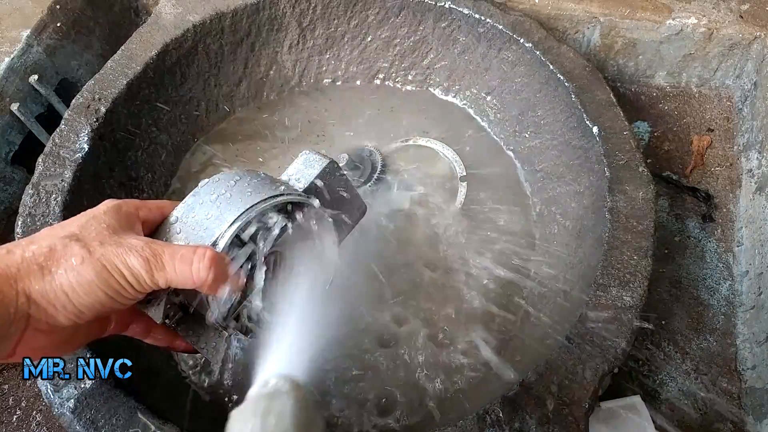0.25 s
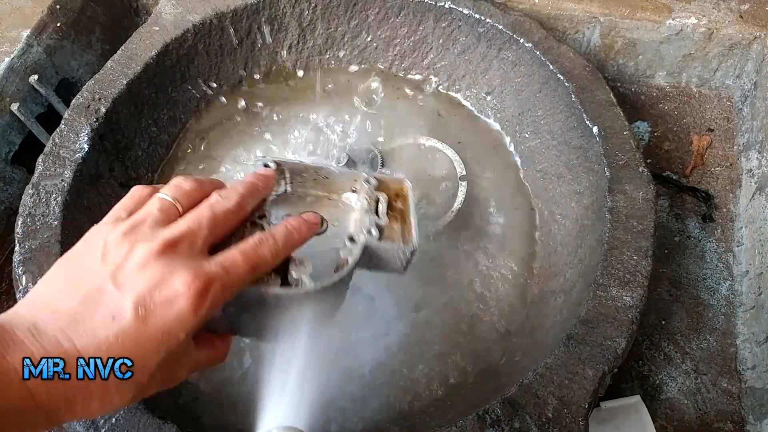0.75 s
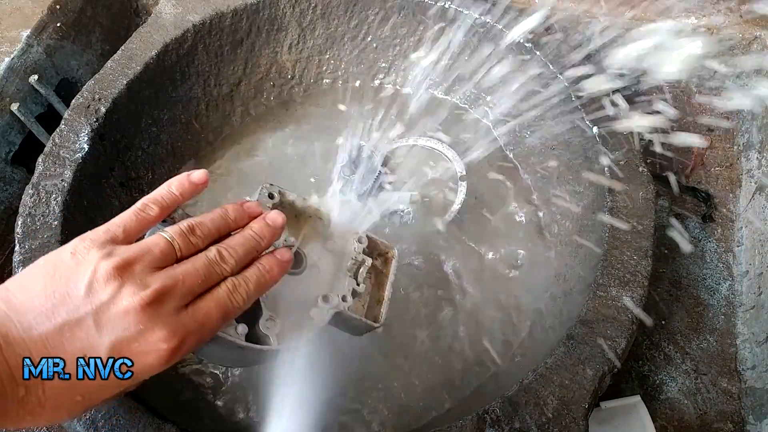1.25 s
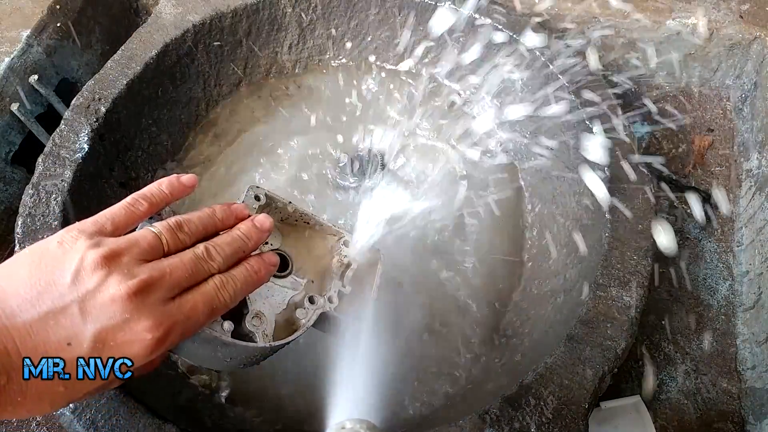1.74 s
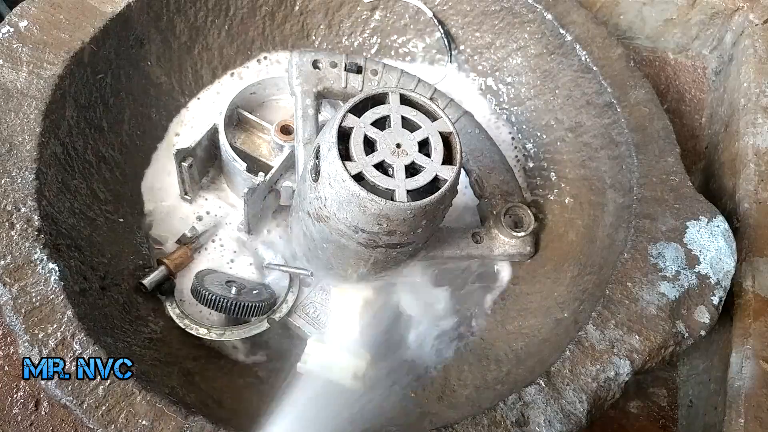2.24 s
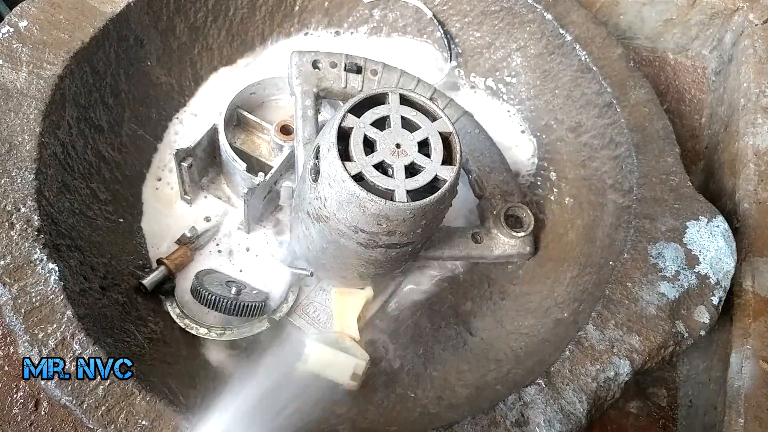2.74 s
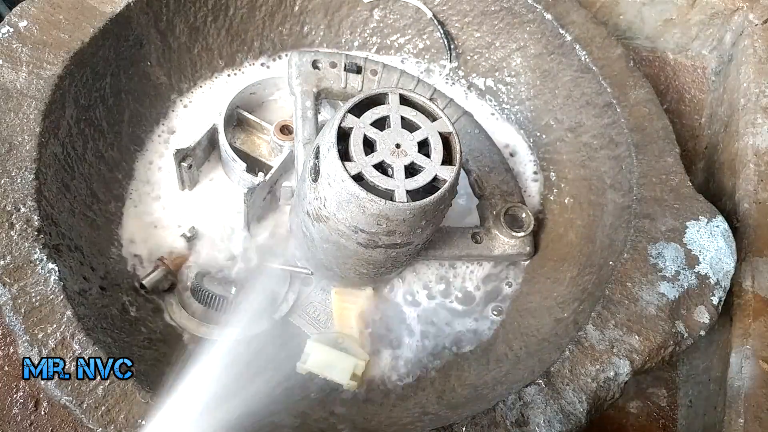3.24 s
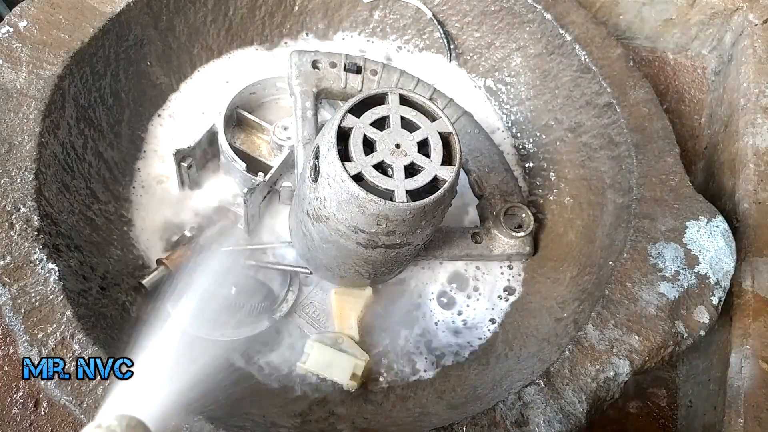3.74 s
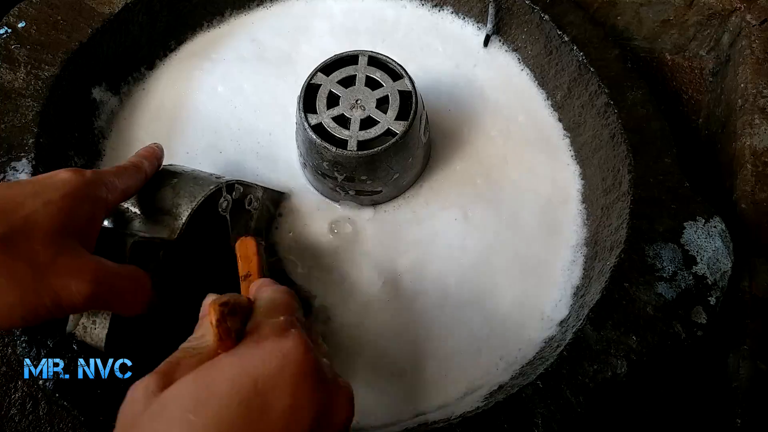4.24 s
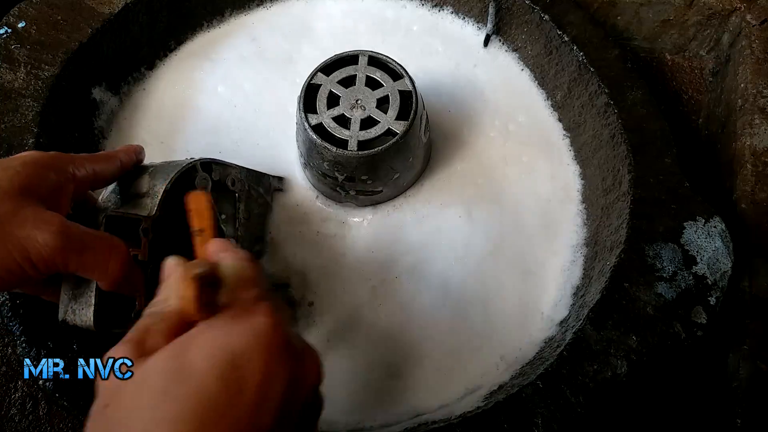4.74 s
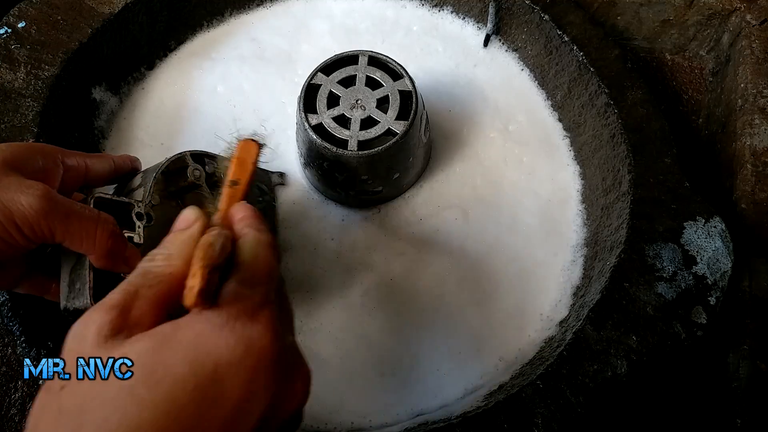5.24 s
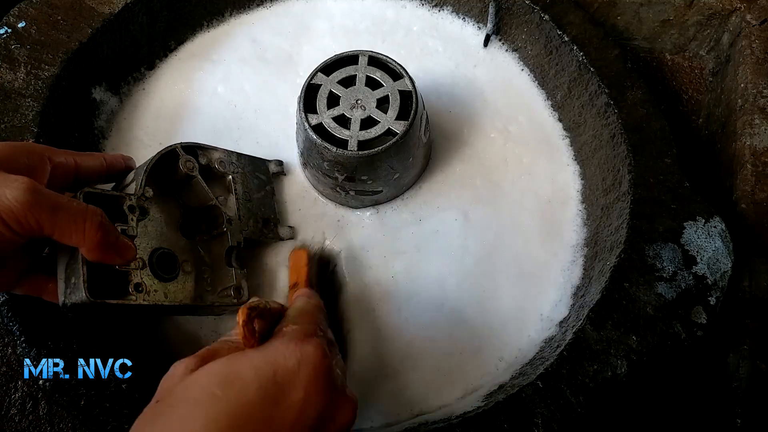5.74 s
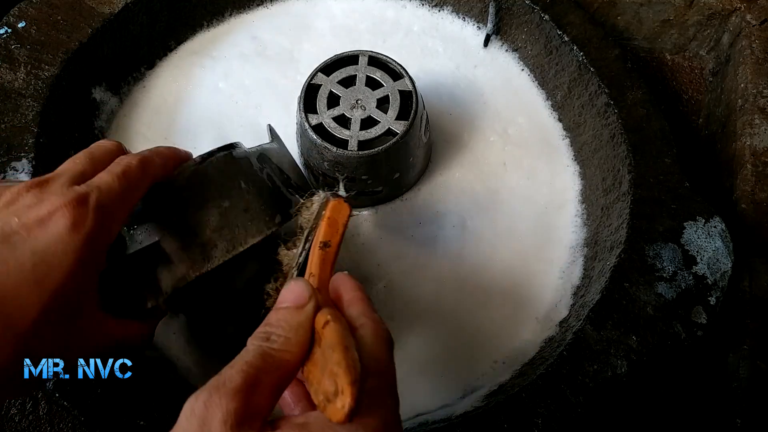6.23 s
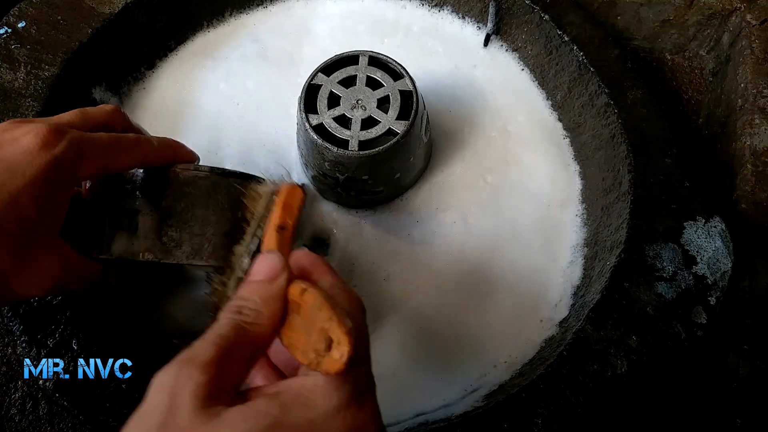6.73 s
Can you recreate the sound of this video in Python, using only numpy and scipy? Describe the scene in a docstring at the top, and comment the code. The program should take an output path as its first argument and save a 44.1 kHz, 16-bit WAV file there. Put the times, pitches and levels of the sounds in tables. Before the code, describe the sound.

Light spray crackling on metal, then a louder jet with a hollow whistle, then abrupt quiet filled by clanking, brush rasps and ringing metal knocks.

```python
"""In a stone basin in a yard, a hose jet sprays metal parts, first lightly, then harder and closer after a hard cut.
A pump hums below it. The jet is noise hiss, bursting drops, a blown hollow part and bubbling water.
After a second cut the jet is off: a stiff brush, made of flickering noise, scrubs a cast housing over foam.
Its handle knocks the metal, a bank of decaying modes that ring more freely once lifted clear of the water.
One microphone hears it all, with a port resonance, a soft overload and a treble limit."""
import sys
import numpy as np
from scipy import signal
from scipy.fft import next_fast_len
from scipy.io import wavfile
from scipy.ndimage import uniform_filter1d

SR = 44100
rng = np.random.default_rng(int(sys.argv[2]) if len(sys.argv) > 2 else 0)


def wrap_up_sound(samples):
    """Save the sound to the file named by the first command line argument, as 16-bit audio."""
    columns = np.atleast_2d(samples).T
    # keep every value between -1 and 1, then stretch to whole-number steps
    tamed = np.clip(columns, -1, 1)
    steps = np.round(tamed * 32767).astype(np.int16)
    wavfile.write(sys.argv[1], SR, steps)


N = 307818

# The two hard cuts between three sections (light jet, hard jet, brush), in seconds.
CUTS_S = (2.0495, 4.0765)

# Low rumble of the place, one curve a section. Each row: time in seconds, level in dB.
RUMBLE_LEVEL = [
    [(0.0, -49), (1.2, -53), (2.05, -53)],
    [(2.05, -42), (2.45, -39.5), (4.08, -41.5)],
    [(4.08, -38), (5.3, -46.5), (6.98, -36.5)],
]
# Colour of the rumble. Each row: frequency in Hz, relative level in dB per Hz.
RUMBLE_COLOUR = [(25, -54), (38, -44), (50, -10), (65, 3.5), (100, -2), (200, -3.5), (400, -10.5),
                 (1000, -17), (4000, -51)]
# Pump hum. Each row: frequency in Hz, rms level in dB against the rumble.
PUMP_TONES = [(49, -1), (100, -7)]
# Lumpy low drone behind the scrubbing. Each row: frequency in Hz, width of each resonance in Hz, rms level in dB.
DRONE_BANDS = [(60, 14, -44), (198.7, 12, -55)]
# Colour of the yard's quiet. Each row: frequency in Hz, relative level in dB per Hz.
AIR_COLOUR = [(300, -30), (700, -3), (1100, -1), (3600, -6.5), (8000, -10), (11000, -14), (15500, -16)]
AIR_DB = -54

# Colour of the nozzle hiss. Each row: frequency in Hz, relative level in dB per Hz.
HISS_COLOUR = [(3000, -20), (5500, -8.5), (7000, -2), (10000, -5), (15500, -8.5)]
# Colour of fine drops bursting on metal. Each row: frequency in Hz, relative level in dB per Hz.
FIZZ_COLOUR = [(2500, -1), (4000, 1.5), (4750, 7.5), (5700, 6), (7000, -5.5), (10000, -6.5)]
# Colour of the splash on the parts. Each row: frequency in Hz, relative level in dB per Hz.
SPLASH_COLOUR = [(600, -16.5), (1200, -11.5), (2000, 8), (3500, 4.5), (4500, 2), (7000, -43)]
# Colour of the churning pool. Each row: frequency in Hz, relative level in dB per Hz.
CHURN_COLOUR = [(150, -15.5), (350, -9.5), (480, -6.5), (570, -0.5), (700, -4), (1100, 0), (1500, -0.5),
                (2500, -22.5)]
HOLLOW_HZ, HOLLOW_WIDTH_HZ = 1629, 210  # centre before it wanders, and width of each of two resonances
# Whistle wandering as the stream moves over the hollow part. Each row: time in seconds, shift in Hz, gain in dB.
WHISTLE_PATH = [(0.0, -0.5, -3.5), (0.3, 0, -3), (0.68, -2, -1.5), (1.1, 23, 1.5), (1.4, 32.5, 0.5),
                (1.65, -3, -4.5), (2.04, 27, -3), (2.2, 103, -6.5), (2.45, 52, -2), (2.7, 20, -4),
                (3.15, 11.5, -5), (3.6, -22.5, -0.5), (4.08, -11, -4.5)]
# Layers of the jet, one row a jet section, before the curves below.
# Each row: nozzle hiss, fizz, splash on the parts, whistle of the hollow part, churn of the pool, all in dB.
JET_MIX = [(-26, -37, -37, -36, -46), (-17.5, -25.5, -29, -25, -33)]
# Strength of the whole jet about that mix, one curve a jet section. Each row: time in seconds, gain in dB.
JET_STRENGTH = [
    [(0.0, -0.5), (0.3, .5), (1.38, -1), (1.55, 0.5), (2.05, 1)],
    [(2.05, 0.5), (2.7, 1), (2.85, 0.5), (3.2, 1), (3.7, 1.5), (4.08, 2)],
]
# The stream sweeps over an edge.
# Each row: middle in seconds, half length in seconds, fizz gain in dB, churn gain in dB (splash takes a share).
EDGE_SWEEPS = [(0.02, .1, 4.5, 3), (0.297, 0.093, 8, -0.5), (0.647, 0.14, 3, 6), (0.886, 0.27, 5.5, 3.5),
               (1.165, 0.037, -5, 4), (1.75, 0.47, 7, 1.5), (2.11, 0.12, -0.5, 4.5), (2.86, 0.096, 6, 4),
               (3.135, 0.11, 0.5, 5.5), (3.75, 0.96, 2, 0.5)]
SPLASH_SHARE = 0.5  # dB of splash gained per dB of churn
# One large bubble pops. The row: time in seconds, level in dB before its onset, frequency in Hz, t60 in seconds.
BUBBLE_PING = (1.147, -18, 2530, .04)

# Colour of the bristles. Each row: frequency in Hz, relative level in dB per Hz.
BRISTLE_COLOUR = [(1500, -53), (3000, 0), (5000, 3), (7000, 6), (10000, 1.5), (15500, -3)]
# Colour of the unringing scrape. Each row: frequency in Hz, relative level in dB per Hz.
GRIT_COLOUR = [(250, 1.5), (500, -5.5), (1000, 0.5), (1500, 2), (2200, -8.5), (3000, -10.5), (5000, -20)]
GRIT_DB = 5.5  # against the rasp of the modes
# Brush strokes. Each row: start in seconds, length in seconds, bristle hiss in dB, rasp through the housing in dB.
BRUSH_STROKES = [(4.153, 0.044, -42.5, -37), (4.261, 0.041, -41, -33.5), (4.449, 0.018, -39.5, -31),
                 (4.558, 0.02, -36.5, -36.5), (4.799, 0.013, -37, -35.5), (4.893, 0.065, -41, -40),
                 (5.118, 0.035, -37.5, -35), (5.19, 0.012, -43, -58), (5.258, 0.048, -43, -43),
                 (5.444, 0.053, -39, -38), (5.582, 0.064, -42.5, -44.5), (5.79, 0.24, -55.5, -65),
                 (5.964, 0.27, -57, -42.5), (6.343, 0.052, -45, -31.5), (6.428, 0.071, -52, -28),
                 (6.56, 0.074, -38.5, -30), (6.786, 0.057, -47.5, -32.5), (6.901, 0.05, -35, -50),
                 (6.958, .03, -42, -29.5)]
RISE_DB_PER_S, FALL_DB_PER_S, REST_DB = 460, 287, -78  # REST_DB: faint hiss of foam between strokes
RASP_FADE_DB_PER_S = 32  # the rasp is strongest as the bristles bite
STROKE_ROUND_S = 0.014  # averaging that eases strokes in and out
RIM_HUM_DB = 21  # gain of the lifted rim, which the bristles keep humming

# Modes of the cast housing. Each row: frequency in Hz, level in dB, t60 in seconds when it hangs free.
HOUSING_MODES = [(155, -8, .1), (205, -3, .12), (245, -2, .12), (300, -3, .12), (385, -8, .08),
                 (705, 0, .1), (785, 0, .08), (1490, -4, .08), (1700, -6, .08), (1845, 0, .08),
                 (1925, -2, .08), (970, 0, .3), (1080, -1, .2), (2370, -7, .12), (2420, 0, .32),
                 (2455, -5, .16), (4700, -6, .14), (5400, -7, .2), (6400, -13, .25), (6890, -12, .25),
                 (10300, -20, .12)]
# Upper limits, in Hz, of the thud, base, body, wall and rim modes; the tick modes lie above.
PART_TOPS_HZ = [500, 880, 1300, 2100, 3000]
# Levels of the parts, one row gripped, one lifted. Each row: base, body, wall, rim, in dB against the knock.
PARTS_DB = [(-1, -11, -0.5, -7.5), (11, -1, -14.5, -13)]
# Knocks. Each row: time in seconds, level in dB, place struck as octaves above 1 kHz of the modes it favours,
# thud in dB, tick in dB, tick in Hz, free ring in dB, free ring of the body in dB; thud and tick against the level.
KNOCKS = [(4.118, 3, 0.07, -15, -17, 3000, -15, -15), (4.133, -7, 0.8, -2, -18, 5540, -15, -10),
          (4.19, -3.5, 1, -6, -17.5, 3020, -27, -25), (4.202, -1.5, -0.88, -23, -32.5, 7780, -8, -10),
          (4.238, -9, 0.6, -2, -20.5, 3700, -5, 2), (4.255, -16, 0, 5.5, -26, 8000, -3.5, -5),
          (4.413, 3, 0.3, -13, -18, 3650, -7, -8), (4.444, -2, 0.4, -25, -31, 8000, -25, -27),
          (4.477, -16.5, 0, 3, -35, 7940, -2, 0.5), (4.623, -21.5, 0.2, 1, -37, 7870, 0.5, -3),
          (4.737, -26.5, -0.4, -15, -34, 4000, -8, -9), (4.792, -30, 0.5, 7, -10, 6550, -5, -7),
          (5.044, -31.5, 1.5, 7, -18, 4000, -5, -7), (5.094, -8.5, 0.27, -11, -25, 7450, -9, -15),
          (5.12, -20.5, 0.42, -24, -5.5, 7250, -12, -12), (5.21, -29.5, .4, -26, -3.5, 7940, -6, -4),
          (5.416, -12, 0.2, -27, -22.5, 7240, -9, -16), (5.846, -3.5, -0.83, -12, -35, 6900, -14.5, -20),
          (5.907, -20, -0.5, -1, -22, 3000, -8, -4), (5.936, -10, 0.15, -6, -18, 3040, -14, -16),
          (6.022, 2, 0.37, -18, -36, 6400, -23, -27), (6.033, 0, -1.2, -19, -33, 3800, -10, -14),
          (6.138, -5.5, 1, -11, -28, 3620, -18.5, -26), (6.266, -2.5, 0.8, -7.5, -26, 3480, -14, -1),
          (6.311, -23, 3, -18, -11, 4500, -22, -20), (6.32, -7.5, 1.3, -6, -24, 4370, -23, -14),
          (6.349, 0, 1.1, -10, -12, 4400, -23, -24), (6.368, -9.5, 1.3, 0.5, -9, 5400, -16, -18),
          (6.409, 7, 1.15, -20, -26, 3150, -26, -34), (6.422, -7.5, 1, -18, -23, 3200, -20, -30),
          (6.437, -5, 1, -10, -25, 3200, -16, -32), (6.484, -16, 0.8, -15, -35, 4000, -20, -8),
          (6.501, -8.5, 0.7, -11, -25, 3240, -16, -30), (6.544, -3.5, 0.6, -5.5, -25.5, 7050, -16.5, -21),
          (6.584, -10.5, 1, -3, -21, 4000, -22, -27), (6.64, -14, 1.2, -4.5, -26, 3970, -6, -30),
          (6.665, 5, 1.23, -15.5, -26.5, 6840, -29, -32), (6.791, -6.5, 2.1, -11.5, -11, 5470, -34, -34),
          (6.867, -22, 0.7, 8, -5.5, 3280, -9, -28)]
LIFT_S = 6.1  # until then a firm grip and the foam shorten the ring
FOCUS_DB, FAR_DB = 16, -26  # modes lose FOCUS_DB per squared octave from the place struck, down to FAR_DB
# The rim rings higher while the grip shifts. Each row: time in seconds, shift in Hz.
RIM_SHIFT = [(6.46, 0), (6.52, 55), (6.7, 45), (6.78, 0)]

# Resonance of the microphone port. The row: frequency in Hz, width in Hz, gain in dB.
MIC_PORT = (8345, 1155, 9.35)
TREBLE_EDGE_HZ = 15850


def gain_of(db):
    """Decibels to amplitude."""
    return 10 ** (np.asarray(db) / 20)


def evened(x):
    """Scales to rms 1."""
    return x / np.sqrt(np.mean(x ** 2) + 1e-20)


def sections():
    """Which of the three sections each sample belongs to."""
    return np.searchsorted(CUTS_S, np.arange(N) / SR)


def level_curve(tables):
    """Amplitude envelope from level curves, one a section; silent in sections without one."""
    t, section = np.arange(N) / SR, sections()
    envelope = np.zeros(N)
    for k, table in enumerate(tables):
        times, db = np.transpose(table)
        envelope += gain_of(np.interp(t, times, db)) * (section == k)
    return envelope


def coloured(x, points):
    """Causal minimum-phase filter with the given spectrum, rms 1 out."""
    hz = abs(np.fft.fftfreq(8192, 1 / SR))
    f, db = np.transpose(points)
    spectrum_db = np.interp(np.log(hz + 1), np.log(f + 1), db, db[0] - 25.0, db[-1] - 16.0)
    log_gain = np.log(gain_of(spectrum_db))
    taps = np.fft.ifft(np.exp(np.conj(signal.hilbert(log_gain)))).real[:4096]
    return evened(signal.oaconvolve(x, taps)[:len(x)])


def resonate(x, hz, width_hz):
    """One resonance of peak gain near 1."""
    r, turn = np.exp(-np.pi * width_hz / SR), 2 * np.pi * hz / SR
    return signal.lfilter([1 - r, 0, r - 1], [1, -2 * r * np.cos(turn), r * r], x)


def resonate_twice(x, hz, width_hz):
    """Two equal resonances in a row, rms 1 out."""
    return evened(resonate(resonate(x, hz, width_hz), hz, width_hz))


def shifted(x, curve):
    """Moves every frequency by a curve of time in seconds and shift in Hz."""
    shift_hz = np.interp(np.arange(N) / SR, *np.transpose(curve)[:2])
    analytic = signal.hilbert(x, next_fast_len(N))[:N]
    return (analytic * np.exp(2j * np.pi * np.cumsum(shift_hz) / SR)).real


def spatter(per_s, spread_db, share, flicker_db, flicker_s):
    """White mix of smooth noise and separate impacts of uneven size, its level flickering."""
    hits = gain_of(spread_db * np.minimum(rng.exponential(1, N), 4)) * (rng.random(N) < per_s / SR)
    hits = hits * rng.standard_normal(N)
    size = max(int(flicker_s * SR), 1)
    flicker = evened(uniform_filter1d(uniform_filter1d(rng.standard_normal(N), size), size))
    mix = np.sqrt(1 - share) * rng.standard_normal(N) + np.sqrt(share) * evened(hits)
    return evened(mix * gain_of(flicker_db * flicker))


def patchy(x, patchy_db):
    """Drifting patches of louder and softer colour, a few hundred Hz by a tenth of a second."""
    z = signal.stft(x, nperseg=512, noverlap=384)[2]
    patches = uniform_filter1d(rng.standard_normal(z.shape), size=5, axis=0)
    patches = uniform_filter1d(patches, size=30, axis=1)
    return signal.istft(z * gain_of(patchy_db * evened(patches)), nperseg=512, noverlap=384)[1][:N]


def air():
    """The yard's quiet: steady faint noise."""
    return gain_of(AIR_DB) * coloured(rng.standard_normal(N), AIR_COLOUR)


def rumble():
    """Low coloured noise whose level drifts and jumps at the cuts."""
    return level_curve(RUMBLE_LEVEL) * coloured(rng.standard_normal(N), RUMBLE_COLOUR)


def drone():
    """Noise through narrow resonances makes a lumpy low drone in the brush section."""
    noise = rng.standard_normal(N)
    bands = sum(gain_of(db) * resonate_twice(noise, hz, width) for hz, width, db in DRONE_BANDS)
    return bands * (sections() == 2)


def pump():
    """Shaking through 7 Hz wide resonances gives a wavering hum while the jet runs."""
    shake = rng.standard_normal(N)
    hum = sum(gain_of(db) * resonate_twice(shake, hz, 7) for hz, db in PUMP_TONES)
    return hum * level_curve(RUMBLE_LEVEL[:2])


def bubbles(per_s, low_hz, top_hz):
    """Trapped air pops as short rising blips, in ten sizes."""
    t, out = np.arange(700) / SR, np.zeros(N)
    size = gain_of(1.2 * np.minimum(rng.exponential(1, N), 4)) * (rng.random(N) < per_s / SR)
    kind = rng.integers(0, 10, N)
    for k, hz in enumerate(np.geomspace(low_hz, top_hz, num=10)):
        blip = np.sin(2 * np.pi * hz * t * (1 + 5 * t)) * t * np.exp(-t * hz / 5)
        out += signal.oaconvolve(size * (kind == k), blip / np.linalg.norm(blip))[:N]
    return evened(out)


def pool_churn():
    """The pool churns: flickering low noise with a gurgle of bubbles."""
    return coloured(spatter(500, 3.9, 0.25, 0.2, 0.0097), CHURN_COLOUR) + gain_of(-6) * bubbles(120, 747, 1301)


def hollow_whistle():
    """The stream blows across a cavity, whose resonance whistles and wanders."""
    blown = spatter(2000, 5.2, 0.045, 0.97, 0.045)
    return shifted(resonate_twice(blown, HOLLOW_HZ, HOLLOW_WIDTH_HZ), WHISTLE_PATH)


def splash_on_parts():
    """Drops splash on metal: uneven impacts with a few small bubbles."""
    return coloured(spatter(3000, 2.9, 0.19, 1.3, 0.005), SPLASH_COLOUR) + gain_of(-11) * bubbles(60, 1000, 3800)


def drop_fizz():
    """Fine drops burst on metal as a dense crackle."""
    return coloured(spatter(4000, 1.5, 0.43, 1.6, 0.0073), FIZZ_COLOUR)


def nozzle_hiss():
    """Water tearing out of the nozzle: nearly smooth bright noise."""
    return coloured(spatter(6000, 1.0, 0.16, 0.99, 0.0024), HISS_COLOUR)


def bubble_ping():
    """A single short plink above the spray: a decaying sine with a soft onset."""
    s, db, hz, t60 = BUBBLE_PING
    t = np.maximum(np.arange(N) / SR - s, 0)
    return gain_of(db - 60 * t / t60) * np.sin(2 * np.pi * hz * t) * (1 - np.exp(-t / .004))


def jet_levels():
    """Amplitudes of the five layers: the section's mix, the jet's strength and the sweeps over edges."""
    t = np.arange(N) / SR
    fizz_db, churn_db = np.zeros(N), np.zeros(N)
    for middle, half, fizz_gain_db, churn_gain_db in EDGE_SWEEPS:
        sweep = np.exp(-((t - middle) / half) ** 2)
        fizz_db += fizz_gain_db * sweep
        churn_db += churn_gain_db * sweep
    whistle_db = np.interp(t, *np.transpose(WHISTLE_PATH)[[0, 2]])
    moves_db = [0 * t, fizz_db, SPLASH_SHARE * churn_db, whistle_db, churn_db]
    mix_db = np.array(JET_MIX).T[:, np.minimum(sections(), 1)]
    return gain_of(mix_db + moves_db) * level_curve(JET_STRENGTH)


def jet():
    """Five layers of water on metal, sharing slow patches of colour, until the second cut."""
    layers = [nozzle_hiss(), drop_fizz(), splash_on_parts(), hollow_whistle(), pool_churn()]
    spray = patchy((jet_levels() * layers).sum(0), 0.84)
    return spray * (sections() < 2) + bubble_ping()


def stroke_levels():
    """Hiss and rasp amplitudes: every stroke rises, holds and falls by the same rule; the rasp also fades."""
    start = np.searchsorted(sections(), 2)
    t = np.arange(start, N) / SR
    power = np.outer([gain_of(REST_DB) ** 2, 0], np.ones(len(t)))
    for s, length, hiss_db, rasp_db in BRUSH_STROKES:
        shape_db = -RISE_DB_PER_S * np.maximum(s - t, 0) - FALL_DB_PER_S * np.maximum(t - s - length, 0)
        fade_db = -RASP_FADE_DB_PER_S * np.maximum(t - s, 0)
        power = power + gain_of([hiss_db + shape_db, rasp_db + shape_db + fade_db]) ** 2
    rounded = uniform_filter1d(np.sqrt(power), int(STROKE_ROUND_S * SR), axis=1)
    return np.pad(rounded, [(0, 0), (start, 0)])


def brush():
    """Bristles flick over the casting; part of their drag sets the damped housing humming."""
    flicks = coloured(spatter(4000, 4, .3, 1.5, .006), BRISTLE_COLOUR)
    drag = spatter(2000, 3, .4, 3.5, .01)
    grit = coloured(spatter(900, 3.6, .4, 2.5, .012), GRIT_COLOUR)
    hiss, bite = stroke_levels()
    lifted_drag = bite * drag * (np.arange(N) > LIFT_S * SR)
    rasp, rim = np.zeros(N), np.zeros(N)
    for hz, db, t60 in HOUSING_MODES:
        if 600 < hz < 3000:
            width_hz = 11 / t60  # damped by the bristles
            rasp += gain_of(db) * resonate(resonate(drag, hz, width_hz), hz, 4 * width_hz)
        if 2100 < hz < 3000:
            rim += gain_of(db) * resonate(lifted_drag, hz, 4 / t60)
    scrape = evened(patchy(evened(rasp) + gain_of(GRIT_DB) * grit, 2.6))
    return hiss * flicks + bite * scrape + gain_of(RIM_HUM_DB) * shifted(rim, RIM_SHIFT)


def knock(place, thud_db, tick_db, tick_hz, free_db, body_db, s, chance):
    """A short contact starts damped, detuned modes; a longer ring, a crack and scattered repeats join them."""
    t = np.arange(int(.3 * SR)) / SR
    early = t[:len(chance)]  # the contact
    hz, db, t60 = np.transpose(HOUSING_MODES)[:, :, None]
    part, lifted = np.searchsorted(PART_TOPS_HZ, hz), s > LIFT_S
    if not lifted:
        t60 = np.where(part >= 4, .05, .33 * t60)
    hz = hz + (part == 4) * np.interp(s, *np.transpose(RIM_SHIFT))

    near_db = np.maximum(-FOCUS_DB * (np.log2(hz / 1000) - place) ** 2, FAR_DB)
    near_db = near_db * (part > 0) * (part < 5)  # thud and tick have levels of their own
    part_db = np.array([thud_db, *PARTS_DB[int(lifted)], tick_db])[part] + near_db

    held_hz = hz * (1 + (.008 if lifted else .025) * chance[:len(hz), None])
    held = gain_of(-60 * early / (0.24 * t60)) * np.sin(2 * np.pi * held_hz * early)
    ring_hz = hz if lifted else held_hz
    modes = gain_of(np.where(part == 2, body_db, free_db) - 60 * t / t60) * np.sin(2 * np.pi * ring_hz * t)
    modes[:, :len(early)] += held
    ring = (gain_of(db + part_db) * modes * (1 - np.exp(-t * hz * 0.76))).sum(0)  # low modes build slower

    crack = evened(resonate(chance, tick_hz, 1630)) + 0.3 * np.gradient(chance)
    crack_level = gain_of(tick_db + 5.5 - 60 * early / 0.015) * np.minimum(early / 0.00095, 1)
    ring[:len(chance)] += crack_level * crack
    # rattle and basin echoes: sparse repeats after the first blow
    scatter = gain_of(-18.5 - 60 * early / 0.16) * chance[::-1] * (abs(chance) > 1.9)
    scatter[0] = 1
    return signal.fftconvolve(ring, scatter)


def knocks():
    """Every blow of the handle and every bump of the part."""
    out = np.zeros(N + SR)
    chance = rng.standard_normal((len(KNOCKS), 3000))
    for (s, level_db, *colour), row in zip(KNOCKS, chance):
        sound = gain_of(level_db) * knock(*colour, s, row)
        out[round(s * SR):][:len(sound)] += sound
    return out[:N]


def scene():
    """One microphone feeds both channels."""
    background = air() + rumble() + drone() + pump()
    return np.tile(background + jet() + brush() + knocks(), (2, 1))


def record(dry):
    """Microphone port resonance, soft overload at full scale, then the treble limit."""
    hz, width_hz, db = MIC_PORT
    bright = dry + (gain_of(db) - 1) * resonate(dry, hz, width_hz)
    clipped = bright / (1 + abs(bright) ** 8) ** (1 / 8)
    lowpass = signal.firwin(511, TREBLE_EDGE_HZ, window=("kaiser", 9), fs=SR)
    return signal.oaconvolve(clipped, lowpass[None], "same")


dry = scene()
out = record(dry)
wrap_up_sound(out)
```